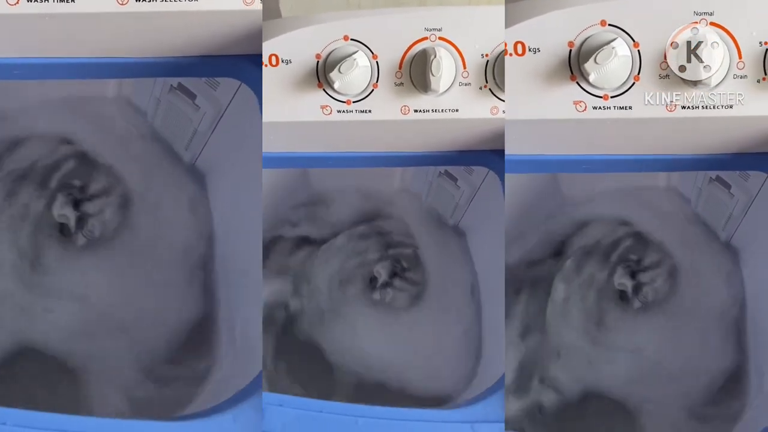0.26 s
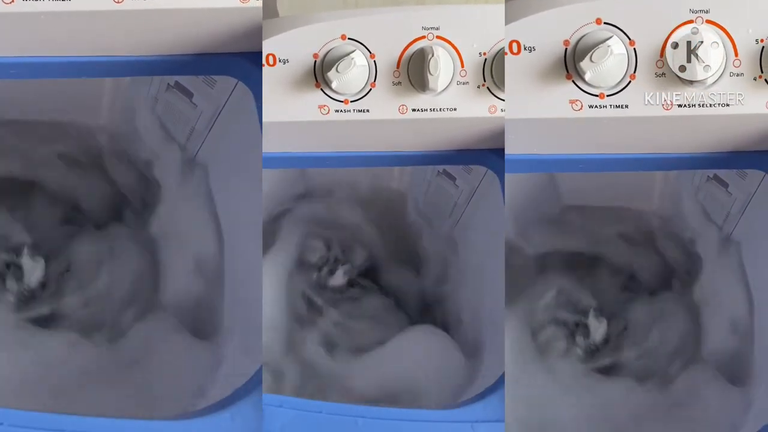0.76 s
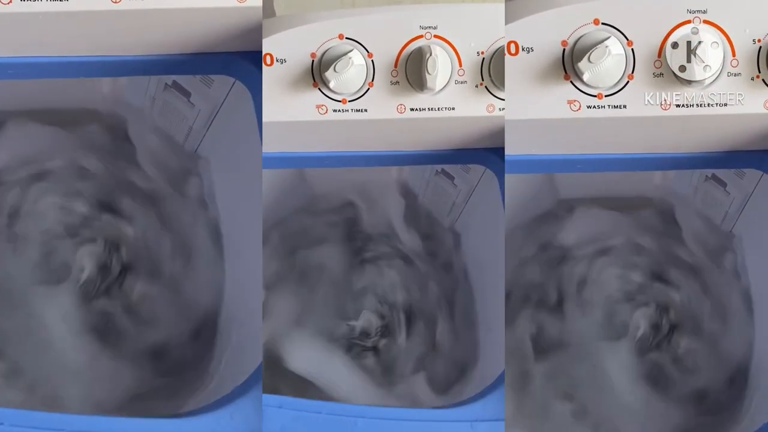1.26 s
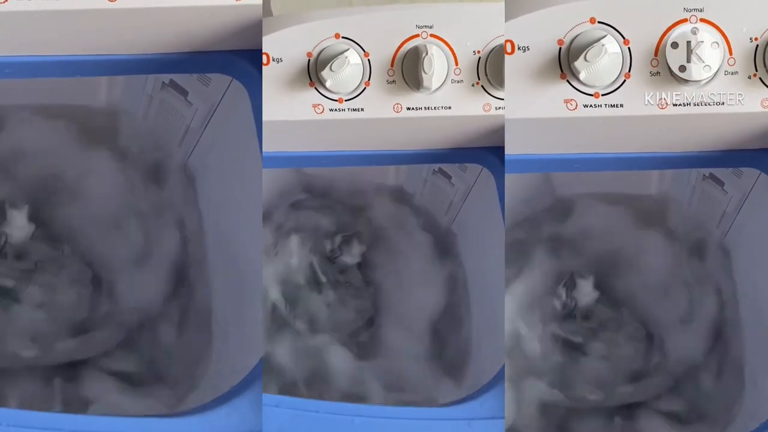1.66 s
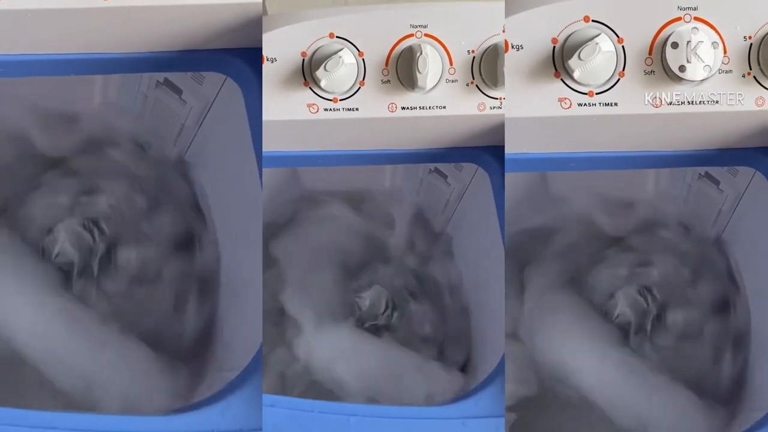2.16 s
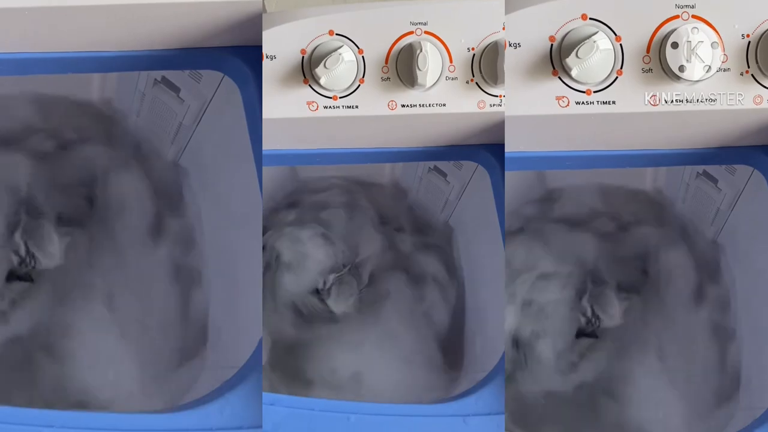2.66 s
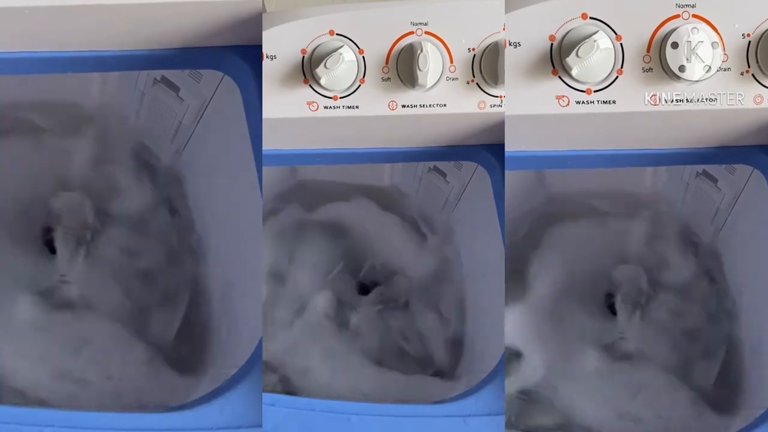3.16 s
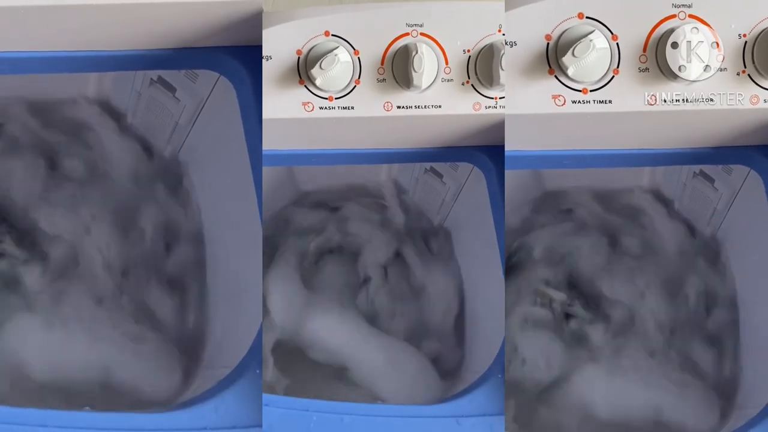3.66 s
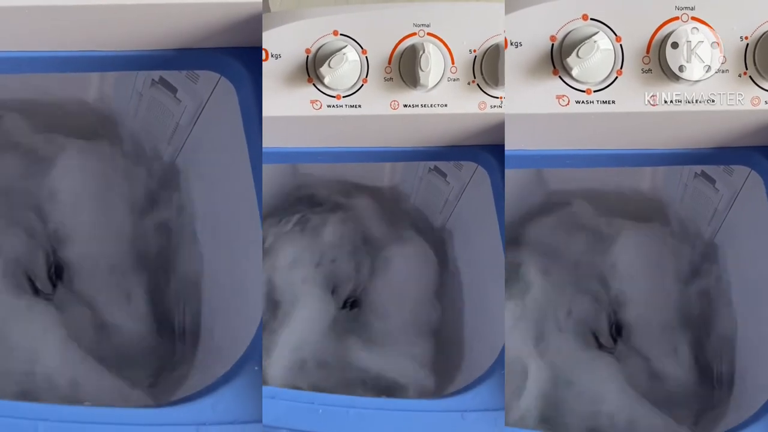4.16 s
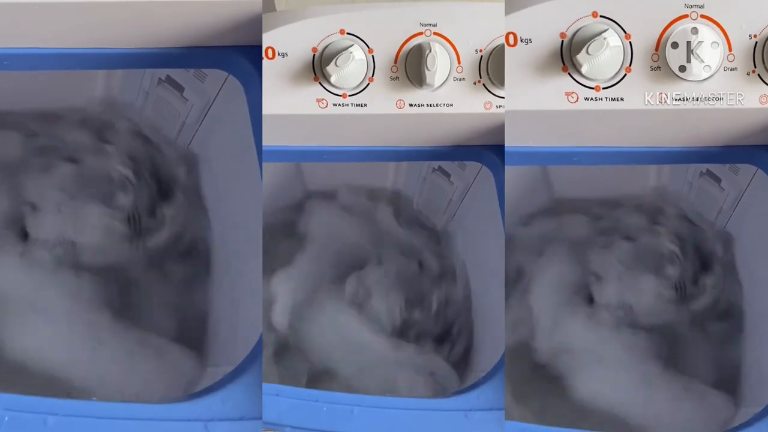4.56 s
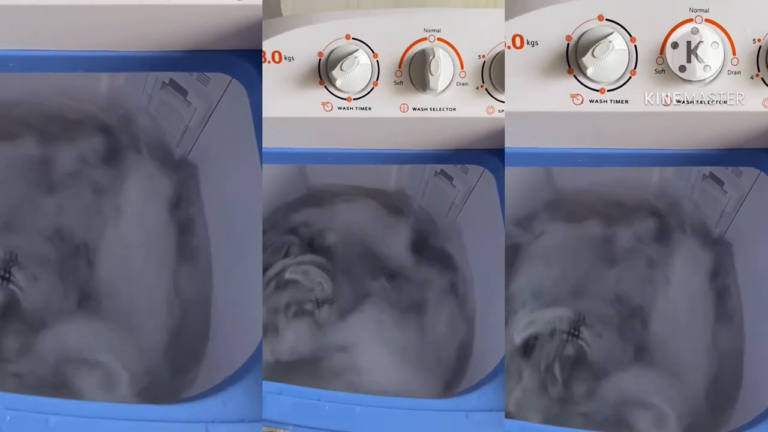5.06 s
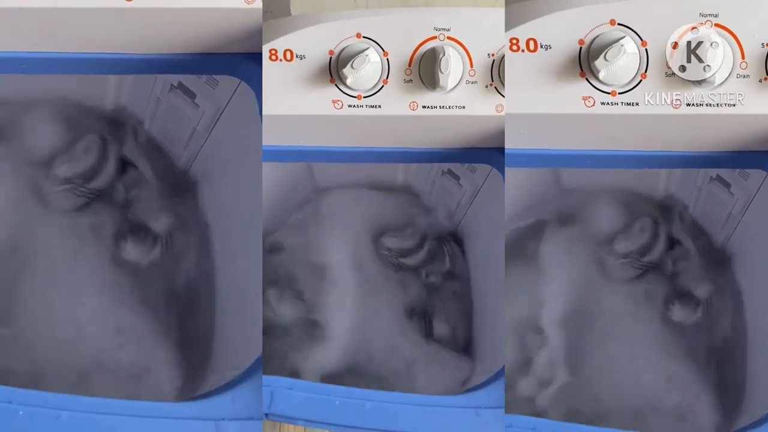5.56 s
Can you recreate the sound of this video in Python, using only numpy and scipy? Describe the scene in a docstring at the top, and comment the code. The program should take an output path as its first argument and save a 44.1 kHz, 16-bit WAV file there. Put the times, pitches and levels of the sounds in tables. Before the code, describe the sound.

A washing machine is heard close up, from just above its open tub. From the start the motor gives a steady low hum, wavering slightly in strength, over the rumble of the shaking plastic cabinet. Soapy water swishes softly at first. From about 0.5 seconds it begins slapping the tub wall in irregular splashes, several a second, with gurgles, plopping bubbles, pinging droplets and a fine fizzing spray. The churning is fuller by 1.5 seconds and keeps surging, with bright plops around 2.3 seconds and the sharpest slaps around 3.1 to 3.3 seconds. Between 4.1 and 4.5 seconds a faint thin whine slides slightly down. At about 5.1 seconds the motor cuts out, and the hum and rumble die away quickly. The water keeps sloshing, splashing and bubbling in the gently rocking tub until the end, near 6 seconds. The tub walls add short, tight reflections.

```python
"""Just above the open tub of a top-loading washing machine, on a hand-held pair of microphone ports.
The motor hums at twice the mains rate and shakes the plastic cabinet. The suds start to slosh,
slap the wall and spit, with bubbles ringing and close reflections off the tub. A faint whine
slides down; then the motor cuts out, leaving the water splashing in the rocking tub."""
import sys
import numpy as np
from scipy import signal
from scipy.fft import rfft, irfft, next_fast_len
from scipy.io import wavfile
from scipy.ndimage import uniform_filter1d

SR = 44100
rng = np.random.default_rng(int(sys.argv[2]) if len(sys.argv) > 2 else 0)


def wav_out(sig):
    """Save sig, one row per channel (or a flat mono array), as 16-bit PCM at SR to the path in sys.argv[1]."""
    wavfile.write(sys.argv[1], SR, np.round(np.clip(np.atleast_2d(sig).T, -1, 1) * 32767).astype(np.int16))


N = 255339
TIME = np.arange(N) / SR
MOTOR_OFF_S = 5.096

# The motor's hum from above the tub. Each row: time in seconds, level in dB before the run-down.
HUM_LEVELS = [(0.0, -4), (0.04, -10), (0.14, -11), (0.42, -7.5), (0.54, -11), (0.75, -7.5), (0.81, -10),
              (1.15, -7.5), (1.33, -11.5), (1.52, -6.5), (1.87, -7), (2.14, -11.5), (2.4, -7.5), (2.81, -8),
              (2.88, -10.5), (3.14, -7.5), (3.28, -9), (3.47, -6), (3.62, -10), (3.92, -10), (4.13, -7.5),
              (4.43, -7.5), (4.62, -12), (4.84, -8), (5.04, -7.5), (5.1, -7.5)]
HUM_HZ = 119.93  # twice the mains rate


def motor_hum():
    """The magnetic pull of the windings: a tone and a weak octave, their phase swaying with the load."""
    coarse = TIME[::256]
    rates_hz = np.geomspace(.5, 9, num=16)
    sway = sum(np.sin(2 * np.pi * (hz * coarse + rng.random())) / np.sqrt(hz) for hz in rates_hz)
    phase = 2 * np.pi * HUM_HZ * TIME + 0.21 * np.interp(TIME, coarse, unit_rms(sway))
    level = amp(over_time(HUM_LEVELS)[0] + run_down(db_per_s=136))
    return np.sqrt(2) * level * (np.sin(phase) + amp(-24.5) * np.sin(2 * phase))


# Cabinet and tub modes, close up. Each row: frequency in Hz, width in Hz, relative level in dB.
CABINET_MODES = [(79.6, 9.7, -5), (140.7, 31, 2), (166.5, 41, -4.5), (223.5, 22.5, -1), (273.9, 8.3, -7),
                 (343.9, 7.5, -12), (360.8, 11.7, -7.5), (444.7, 18, -13.5), (633, 20, -21.5),
                 (672, 21, -16), (848.5, 17, -21), (1030, 28, -21)]
# The broad shaking under them. Each row: frequency in Hz, relative spectral density in dB.
RUMBLE_SPECTRUM = [(20, -31), (45, -44), (70, -5), (200, -4), (400, -17.5), (800, -23), (1600, -41.5),
                   (4000, -53)]
LOAD_UP_S, COAST_S = .8, 0.046  # the water load takes hold; the rotor runs on after the current stops


def cabinet_shake():
    """The rough-running motor rings the cabinet modes over a rumble; the tub rocks on after it stops."""
    white = rfft(rng.standard_normal(N))
    f = np.fft.rfftfreq(N, 1 / SR)
    power = sum(amp(2 * db) / width / (1 + (2 * (f - hz) / width) ** 2) ** 2
                for hz, width, db in CABINET_MODES)
    ringing = unit_rms(irfft(white * np.sqrt(power), N))
    rumble = noise(RUMBLE_SPECTRUM, size=2048, patchy_db=1.5, flicker_db=-1.5)
    light_start_db = -1.5 * np.maximum(1 - TIME / LOAD_UP_S, 0)
    running = amp(-22.5 + light_start_db + run_down(db_per_s=102.5, late_s=COAST_S))
    rocking = amp(-40)
    return (running + rocking) * (ringing + amp(-1) * rumble)


# Water hitting the wall below the microphone. Each row: start in seconds, level in dB,
# fizz over crack in dB, body over the level in dB, spread of the landing in seconds.
WALL_SLAPS = [(0.511, -34, -3, 3, 0.0019), (0.5953, -28, -8, 0, 0.00092), (0.6477, -32, 8, -5, 0.004),
              (0.7103, -26, -8, 3, 0.0036), (0.7642, -26.5, 5.5, -3, 0.0072), (0.8895, -35.5, 6, 3.5, .004),
              (0.9119, -35, 0, 9, .002), (1.007, -29.5, 1, -0.5, 0.0026), (1.2237, -27.5, 9, -8, 0.0012),
              (1.3394, -21, 3, -11.5, 0.0017), (1.461, -32, 7.5, 6, .003), (1.484, -30.5, -4, -4.5, 0.006),
              (1.5934, -26.5, 4.5, -3, 0.0034), (1.6473, -23.5, -5, 7, 0.00052),
              (1.836, -32.5, -1, -5, .005), (2.137, -26.5, 9, 4, 0.0013), (2.2503, -28, 2, -2, 0.0047),
              (2.2652, -33.5, 14, 5.5, 0.0054), (2.3218, -33.5, -4, -9, .003), (2.62, -34, 24, -2, .002),
              (2.7358, -27.5, 16.5, -4, 0.003), (2.956, -31.5, 9, -9, 0.0015),
              (3.006, -26.5, -0.5, -0.5, 0.0062), (3.1217, -22, -0.5, -4.5, .01),
              (3.1596, -18.5, -4, -5, 0.0012), (3.222, -27, 5, -5, 0.0017), (3.2771, -20, -4, -6.5, 0.0022),
              (3.4044, -30.5, -1, -1, 0.0058), (3.5213, -27, 7, -13, 0.0055), (3.576, -28.5, 6, -5, .001),
              (3.8283, -27.5, 7, -11, .001), (3.9438, -28, 15, -8, 0.0014), (3.984, -33, -10, 2, .002),
              (4.183, -27, 2, 5, 0.0013), (4.3016, -29.5, 20, -3, 0.0022), (4.3336, -27.5, -2.5, 3, .002),
              (4.4514, -38, -17, -8, 0.0019), (4.5207, -25.5, 0, -17, 0.00071),
              (4.721, -35.5, -4, 15, 0.0015), (4.8664, -27, 12, 2, .002), (4.924, -22.5, 0, -8, 0.002),
              (5.0425, -28.5, -15, 6.5, .002), (5.1176, -35, -13, 1.5, 0.0028),
              (5.41, -29.5, -1, -1, 0.0035), (5.527, -26, 2, -2, 0.003), (5.5967, -30.5, -8.5, -7.5, .002),
              (5.65, -24, 3.5, 7.5, .002), (5.6718, -30.5, -6, -0.5, 0.0016),
              (5.7715, -27, -5, 2.5, 0.0029)]
SLAP_BANDS_HZ = [(3000, 5250), (990, 2800), (6340, 13700)]  # crack, body, fizz


def slaps():
    """A sheet of water lands in a short burst, leaves a falling mist and throws a ringing droplet."""
    out, t = np.zeros(N), np.arange(3000) / SR
    white = rng.standard_normal((len(WALL_SLAPS), len(t)))
    bands = [unit_rms(bandpass(white, *edges)) for edges in SLAP_BANDS_HZ]
    droplet_hz = 3000 + 2500 * rng.random(len(WALL_SLAPS))
    attack = 1 - np.exp(-t / .0005)
    for k, (start, db, fizz_db, body_db, spread_s) in enumerate(WALL_SLAPS):
        after = np.maximum(t - spread_s, 0)
        impact, mist = amp(-60 * after / 0.0049), amp(-19.5 - 60 * after / 0.13)
        crack_db = db - fizz_db / 2
        levels = amp([crack_db, db + body_db, db + fizz_db / 2])
        burst = sum(level * band[k] for level, band in zip(levels, bands))
        add(out, start, attack * (impact + mist) * burst)
        add(out, start, amp(crack_db - 1.5) * bubble(droplet_hz[k], t60=0.016, glide=.05))
    return out


# Bubbles that stand out at close range. Each row: start in seconds, level in dB, pitch in Hz.
LOUD_BUBBLES = [(0.615, -25, 554), (0.7085, -25, 905), (0.912, -27.5, 2050), (1.0028, -22.5, 1925),
                (1.206, -19.5, 1870), (1.5291, -21, 3380), (1.644, -20, 1520), (1.6453, -16, 3400),
                (1.7351, -18, 2160), (1.909, -25, 1760), (2.0702, -20, 845), (2.1584, -20.5, 1790),
                (2.277, -11.5, 1710), (2.3214, -15, 1084), (2.408, -23, 950), (2.4225, -17, 870),
                (2.492, -21.5, 790), (2.5488, -20.5, 1030), (2.6086, -20.5, 1690), (2.736, -24, 2180),
                (2.768, -23.5, 2080), (3.1212, -14, 5100), (3.1266, -14, 1970), (3.125, -14, 1030),
                (3.2065, -25, 2120), (3.225, -19, 2600), (3.2766, -12, 4410), (3.284, -19, 1770),
                (3.3951, -21, 1870), (3.4321, -20.5, 935), (3.5216, -18, 4900), (3.7695, -25, 886),
                (3.83, -17.5, 584), (4.0129, -24, 1960), (4.1072, -20.5, 2140), (4.404, -19, 4920),
                (4.4171, -20.5, 1790), (4.4502, -14, 4140), (4.4875, -16, 970), (4.5201, -14, 5100),
                (4.6052, -21.5, 2230), (4.6329, -20.5, 1580), (4.7207, -17.5, 2050), (4.721, -15.5, 3130),
                (4.7488, -14, 1654), (5.0402, -23.5, 1870), (5.1513, -22.5, 710), (5.232, -20, 2620),
                (5.2548, -19.5, 730), (5.2905, -18.5, 1740), (5.4063, -22, 1970), (5.479, -21, 2250),
                (5.5245, -20, 1100), (5.5967, -19, 3490), (5.6085, -17, 2070), (5.6497, -27, 1570),
                (5.6667, -21, 684)]


def plops():
    """Splashy bubbles ring, from dull plops in the suds to pinging droplets; higher ones die sooner."""
    out = np.zeros(N)
    roughness = unit_rms(uniform_filter1d(rng.standard_normal((len(LOUD_BUBBLES), 1400)), 20))
    for (start, db, hz), rough in zip(LOUD_BUBBLES, roughness):
        ring = bubble(hz, t60=0.023 * (1000 / hz) ** .3, glide=0.082)
        add(out, start, amp(db) * ring * (1 + 0.64 * rough))
    return out


def bubble(hz, t60, glide):
    """A pocket of air rings briefly, its pitch rising as it nears the surface."""
    t = np.arange(1400) / SR
    envelope = amp(-60 * t / t60) * (1 - np.exp(-t / 0.000043))
    return envelope * np.sin(2 * np.pi * hz * (t + glide * t ** 2 / t60))


# The churning in the open tub between surges. Each row: time in seconds, wash in dB, spray in dB.
CHURN_LEVELS = [(0.0, -43, -55), (0.32, -45.5, -55), (0.55, -41.5, -51.5), (0.71, -38.5, -45),
                (0.84, -40.5, -44), (1.03, -36.5, -42), (1.47, -30.5, -36.5), (1.92, -38, -43),
                (2.11, -36.5, -46.5), (2.23, -36, -39.5), (2.35, -30.5, -35), (2.6, -35, -40),
                (2.8, -33.5, -38.5), (3.16, -33, -39), (3.27, -33, -40.5), (3.53, -36, -47),
                (3.79, -36, -41), (4.01, -33, -41.5), (4.14, -33.5, -39), (4.61, -34.5, -39),
                (4.95, -31.5, -35), (5.11, -29, -34.5), (5.73, -39, -47), (5.79, -33, -40)]
# The wash, heard from above. Each row: frequency in Hz, relative spectral density in dB.
WASH_SPECTRUM = [(60, 12), (200, -3), (500, 4), (1000, -0.5), (1450, -1.5), (1900, -0.5), (2600, -3),
                 (4000, -9), (8000, -19.5)]
# The fine spray over it. Each row: frequency in Hz, relative spectral density in dB.
SPRAY_SPECTRUM = [(1200, -12), (2600, 2), (4200, 2.5), (5200, 5.5), (7000, 0.5), (11000, 0), (14000, -1),
                  (16000, -18.5)]


def churn():
    """Gurgling wash and fine spray with spitting foam, both surging around each slap."""
    wash = noise(WASH_SPECTRUM, size=512, patchy_db=0.5, flicker_db=3.0)
    wash += amp(-6.5) * small_bubbles(low_hz=1245, high_hz=2444, cycles=15.7, per_s=260, spread_db=4.0)
    spray = noise(SPRAY_SPECTRUM, size=256, patchy_db=4.0, flicker_db=3.5)
    spray += amp(-5.0) * small_bubbles(low_hz=2940, high_hz=13300, cycles=9.6, per_s=500, spread_db=5.0)
    wash_db, spray_db = over_time(CHURN_LEVELS)
    surge = surges()
    wash_level = np.hypot(amp(wash_db), amp(-17.5) * surge)
    spray_level = np.hypot(amp(spray_db), amp(-17) * surge)
    return wash_level * wash + spray_level * spray


def surges(half_length_s=.035):
    """The smooth swell of water on which each slap rides, as an amplitude."""
    t = np.arange(0, N / SR + .01, .005)
    start, db = np.transpose(WALL_SLAPS)[:2, :, None]
    power = amp(2 * db) * np.exp(-((t - start) / half_length_s) ** 2)
    return np.sqrt(np.interp(TIME, t, power.sum(0)))


def small_bubbles(low_hz, high_hz, cycles, per_s, spread_db):
    """Many small bubbles bursting at random, a few of them larger."""
    strength = amp(spread_db * np.minimum(rng.exponential(1, N), 3.5))
    bursts = strength * (rng.random(N) < per_s / SR)
    pitch_index = rng.integers(0, 10, N)
    size = next_fast_len(N + 1400)
    rings = [bubble(hz, t60=cycles / hz, glide=0.31) for hz in np.geomspace(low_hz, high_hz, num=10)]
    spectrum = sum(rfft(bursts * (pitch_index == k), size) * rfft(ring, size)
                   for k, ring in enumerate(rings))
    return unit_rms(irfft(spectrum, size)[:N])


# The load, deep in the tub. Each row: frequency in Hz, relative spectral density in dB.
SLOSH_SPECTRUM = [(18, -14), (35, 6), (55, 4), (85, -0.5), (170, 6), (400, -29), (1000, -34.5)]


def slosh():
    """The whole load sloshes low against the tub."""
    return amp(-35.5) * noise(SLOSH_SPECTRUM, size=2048, patchy_db=6.5, flicker_db=3.5)


def whine(span_s=(4.1, 4.52), slide_hz=(440, 410.6), swell_db=(-37.5, -29.5)):
    """A faint, thin tone with a weak octave slides down as it grows."""
    t, out = np.arange(*span_s, 1 / SR), np.zeros(N)
    phase = 2 * np.pi * np.cumsum(np.interp(t, span_s, slide_hz)) / SR
    tone = np.sin(phase) + amp(-14) * np.sin(2 * phase)
    level = amp(np.interp(t, span_s, swell_db)) * signal.windows.tukey(len(t), .3)
    add(out, span_s[0], np.sqrt(2) * level * tone)
    return out


def tub_reflections(x, t60=0.16):
    """Close reflections off the tub walls and lid: sparse taps of random sign that die fast."""
    delays = np.arange(40, 3000, 20) + rng.integers(0, 20, 148)
    taps = np.zeros(3100)
    taps[delays] = rng.choice([-1., 1.], 148) * amp(-60 * delays / SR / t60)
    return signal.oaconvolve(x, taps / np.linalg.norm(taps))[:N]


def scatter(x):
    """Sound arriving by many changing paths: the same colour with shuffled phases."""
    spectra = signal.stft(x, nperseg=256, noverlap=192)[2]
    shuffled = spectra * np.exp(2j * np.pi * rng.random(spectra.shape))
    return 2 * signal.istft(shuffled, nperseg=256, noverlap=192)[1][:N]


def noise(spectrum, size, patchy_db, flicker_db):
    """Coloured noise with drifting patches and a flicker shared by all frequencies."""
    frames, bins = 4 * N // size + 5, size // 2 + 1
    real, imag, patches = rng.standard_normal((frames, bins, 3)).T
    patches = unit_rms(uniform_filter1d(uniform_filter1d(patches, 8, 0), 12, 1))
    flicker = unit_rms(uniform_filter1d(rng.standard_normal(frames), 5))
    colour = amp(over_pitch(spectrum, np.fft.rfftfreq(size, 1 / SR)))[:, None]
    spectra = (real + 1j * imag) * colour * amp(patchy_db * patches + flicker_db * flicker)
    return unit_rms(signal.istft(spectra, nperseg=size, noverlap=3 * size // 4)[1][:N])


def run_down(db_per_s, late_s=0):
    """Gain in dB, falling from late_s after the motor cuts out."""
    return -db_per_s * np.maximum(TIME - MOTOR_OFF_S - late_s, 0)


def amp(db):
    return 10 ** (np.asarray(db) / 20)


def unit_rms(x):
    return x / np.sqrt(np.mean(x ** 2) + 1e-20)


def over_pitch(rows, hz):
    row_hz, values = np.transpose(rows)
    return np.interp(np.log(hz + 1), np.log(row_hz + 1), values)


def over_time(rows):
    seconds, *columns = np.transpose(rows)
    return [np.interp(TIME, seconds, column) for column in columns]


def add(mix, start_s, sound):
    part = mix[round(start_s * SR):][:len(sound)]
    part += sound[:len(part)]


def bandpass(x, low_hz, high_hz):
    return signal.sosfilt(signal.butter(2, [low_hz, high_hz], "band", fs=SR, output="sos"), x)


# Phase between the two microphone ports. Each row: frequency in Hz, the left port's lead in radians.
PORT_LEAD = [(0, 0), (2100, 0), (3900, 1.4), (4900, .25), (5600, .7), (6800, 2.9), (7600, 3.2), (9700, 6.1),
             (10900, 6.3), (12900, 9.1), (14000, 9.6), (15600, 12.3), (17000, 12.8)]
# How alike the ports sound. Each row: frequency in Hz, likeness from 0 to 1.
PORT_LIKENESS = [(60, 1), (200, 0.98), (400, 0.99), (620, 0.84), (1000, 0.91), (1900, 1), (3200, 0.48),
                 (4300, 0.43), (7200, 1), (8600, 0.92), (10400, 0.93), (12000, 0.69), (13500, 1),
                 (15200, 1)]
# Balance of the hand-held pair. Each row: frequency in Hz, left minus right in dB.
PORT_BALANCE = [(60, -1.14), (300, -0.45), (800, -2), (1700, 0), (2900, -3), (5500, 0), (15000, 0)]


def microphone_ports(direct, scattered):
    """Two ports hear one field with a phase lag that grows with pitch; a scattered share differs."""
    size = next_fast_len(N + 4096)
    f = np.fft.rfftfreq(size, 1 / SR)
    likeness = np.clip(over_pitch(PORT_LIKENESS, f), 0, 1)
    mid = np.sqrt((1 + likeness) / 2) * rfft(direct, size)
    side = np.sqrt((1 - likeness) / 2) * rfft(scattered, size)
    lead = np.interp(f, *np.transpose(PORT_LEAD))
    to_left = amp(over_pitch(PORT_BALANCE, f) / 2) * np.exp(.5j * lead)
    return irfft(np.array([(mid + side) * to_left, (mid - side) / to_left]), size)[:, :N]


def scene():
    """Motor and water from just above the tub; all but the hum also arrives scattered."""
    water = slosh() + churn() + slaps() + plops()
    machine = cabinet_shake() + whine() + water + amp(-9.5) * tub_reflections(water)
    return microphone_ports(direct=machine + motor_hum(), scattered=scatter(machine))


def record(dry):
    """The microphone drops the deepest bass, the loudest crests clip, and the top treble is cut."""
    thinned = signal.sosfilt(signal.butter(4, 44, "high", fs=SR, output="sos"), dry)
    clipped = np.clip(thinned, -1, 1)
    lowpass = signal.firwin(511, cutoff=15800, window=("kaiser", 9), fs=SR)
    return signal.oaconvolve(clipped, lowpass[None], "same")


dry = scene()
out = record(dry)
wav_out(out)
```